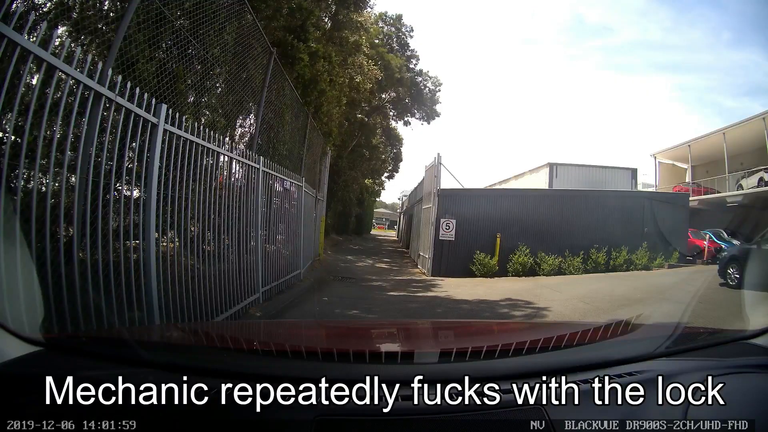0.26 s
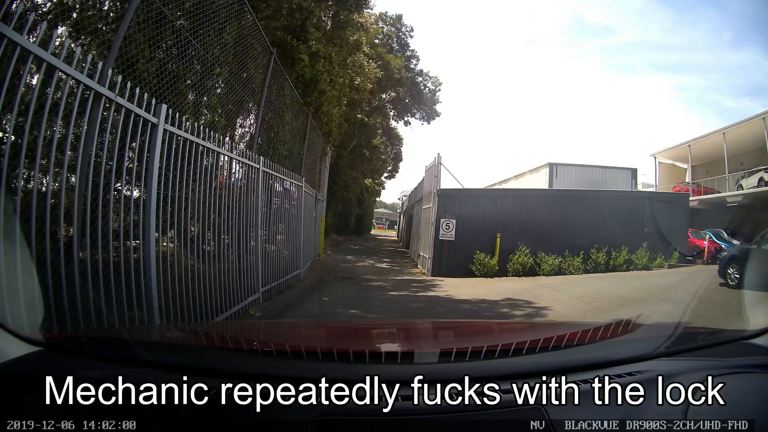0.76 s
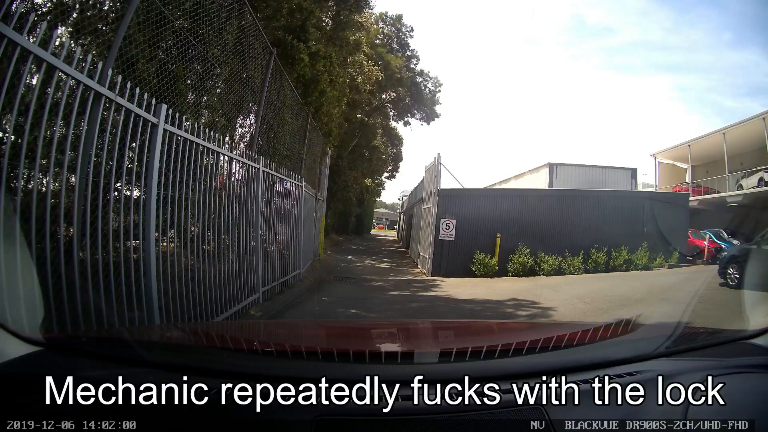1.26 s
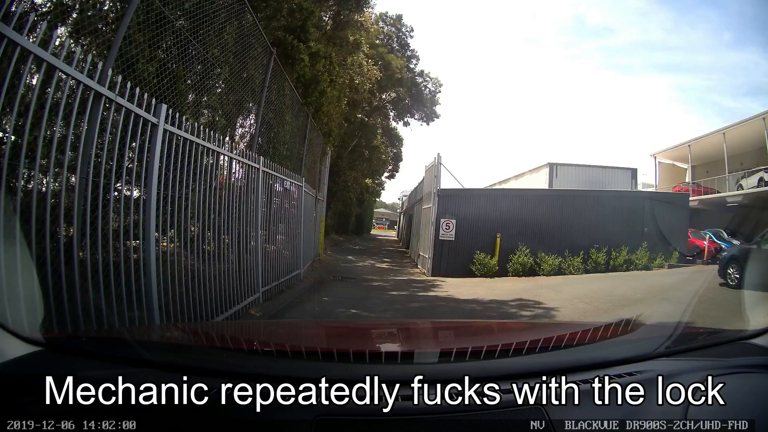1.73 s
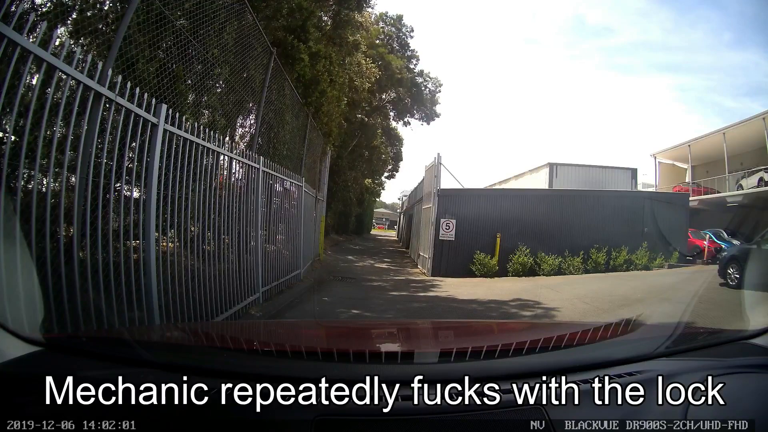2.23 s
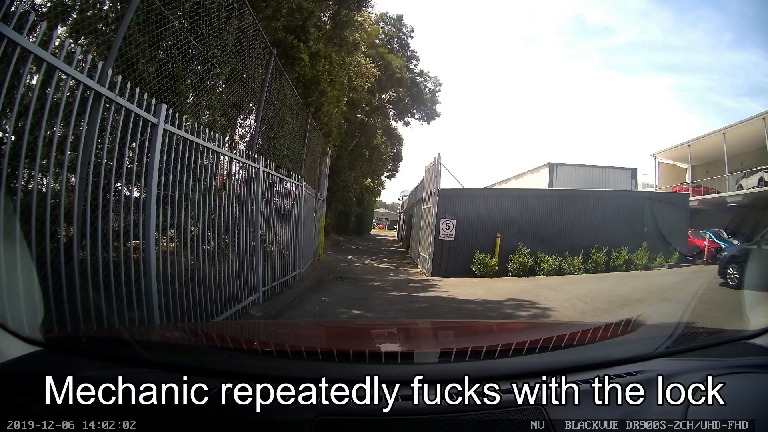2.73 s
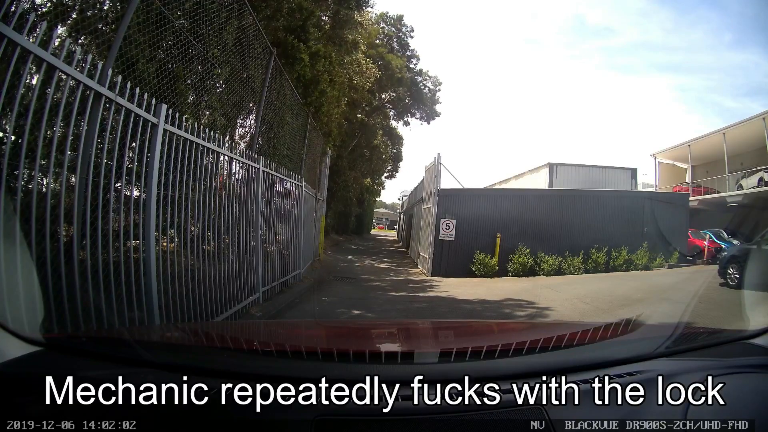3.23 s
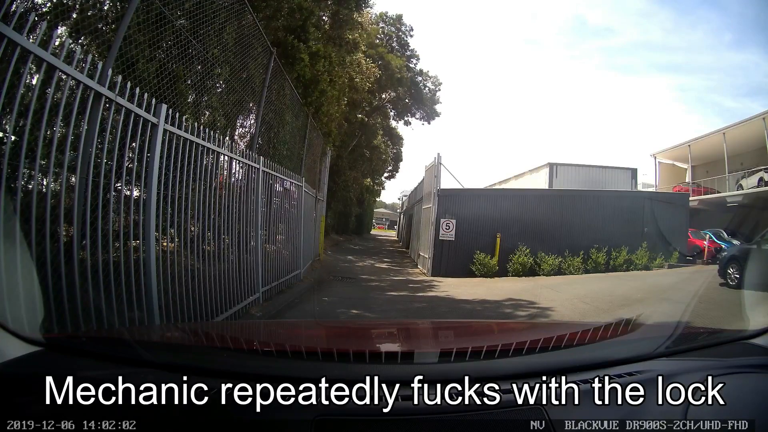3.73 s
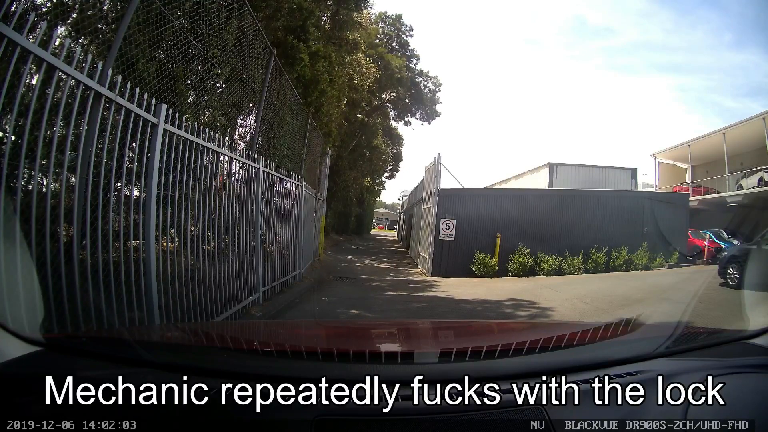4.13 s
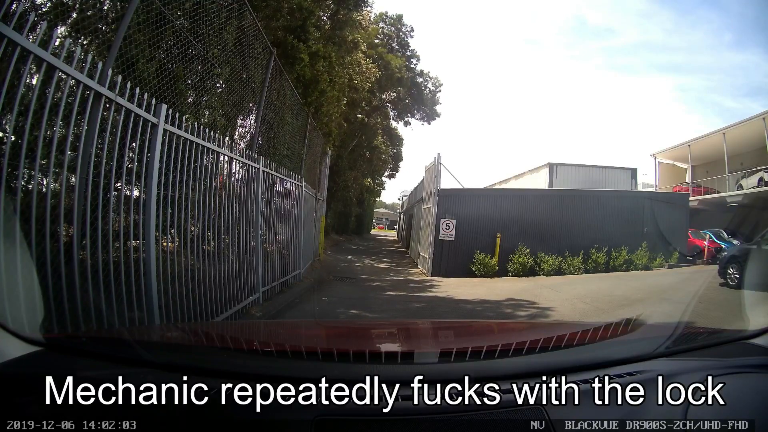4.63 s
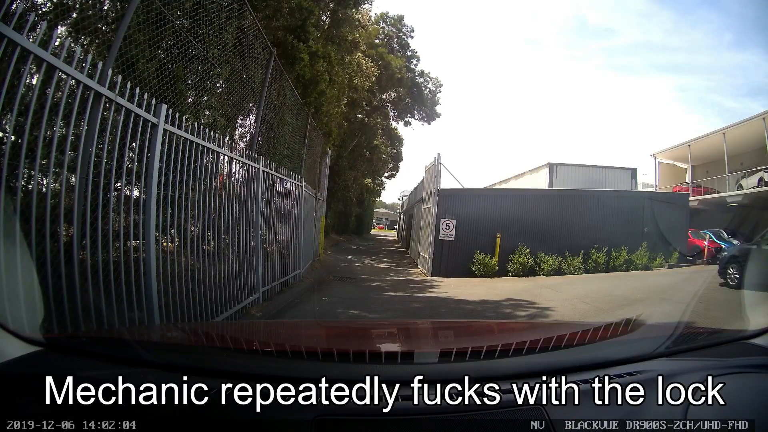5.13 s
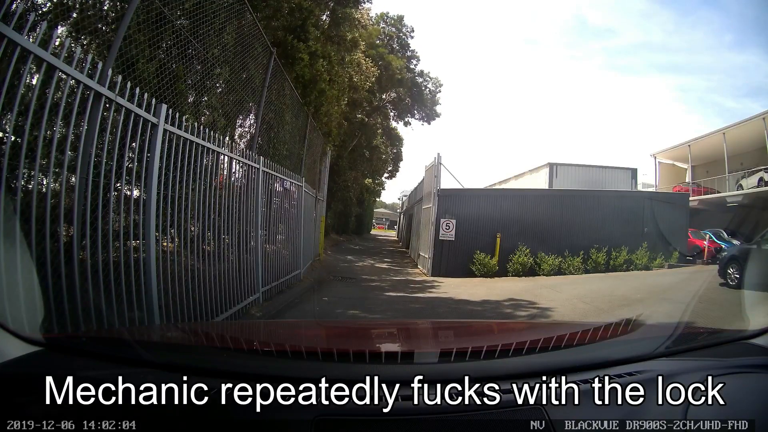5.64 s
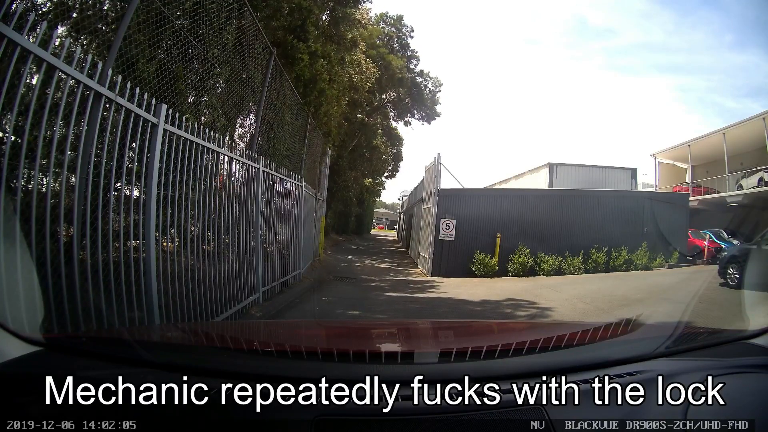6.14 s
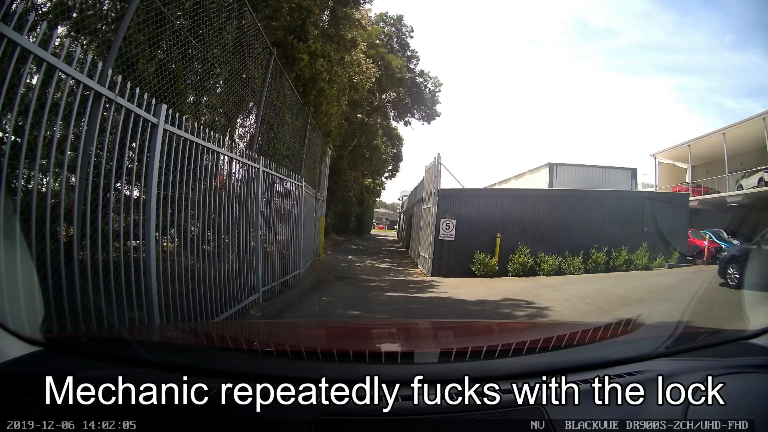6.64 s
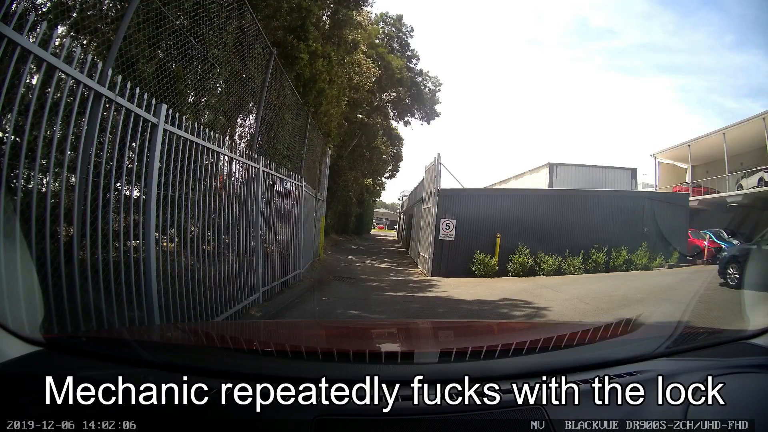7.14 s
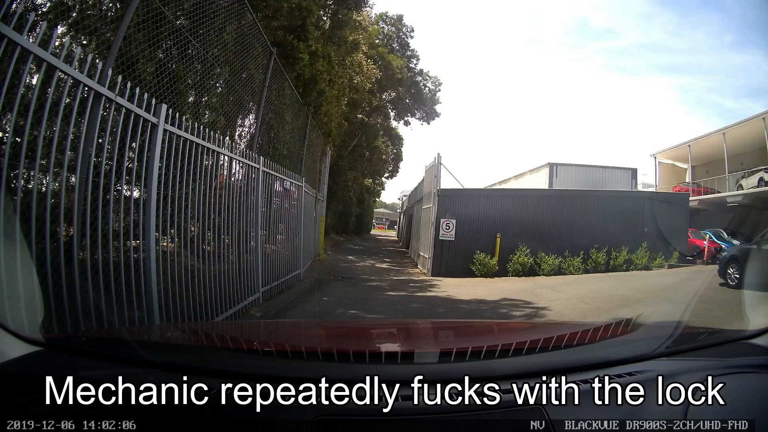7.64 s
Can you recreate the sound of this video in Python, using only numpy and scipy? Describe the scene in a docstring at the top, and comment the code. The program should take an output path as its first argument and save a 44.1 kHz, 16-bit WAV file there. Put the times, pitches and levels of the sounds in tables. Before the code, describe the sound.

Heard from a dashboard microphone in a closed, parked car: near silence with faint rumble and hiss, then the central locking clunks seven times at uneven gaps. Most are quick kick-and-slam pairs with a tiny gear rattle between, door panels ringing briefly. Relay clicks and a soft settling knock follow each. A faint high chirp flutters once midway.

```python
"""Inside a parked car the central locking is worked seven times over a faint rumble and hiss.
Each time a relay clicks close by and small motors rattle their gears: noisy, filtered tooth clicks.
Most strokes start with a kick, all end in a slam: filtered noise plus the door's ringing sine tones.
The first stroke also scrapes; about .4 s after each, the gears run back and settle, and springs shiver.
A fluttering chirp comes after the third working, a faint tap in the long pause after the fourth."""
import sys
import numpy as np
from scipy import signal
from scipy.fft import rfft, irfft, next_fast_len
from scipy.io import wavfile
from scipy.ndimage import uniform_filter1d

SR = 44100
rng = np.random.default_rng(int(sys.argv[2]) if len(sys.argv) > 2 else 0)


def waveform_to_disk(signal):
    """Save audio, clipped to [-1, 1], as 16-bit WAV at the path in sys.argv[1]."""
    frames = np.transpose(np.atleast_2d(signal))
    scaled = np.clip(frames, -1, 1) * 32767
    samples = np.round(scaled).astype(np.int16)
    wavfile.write(sys.argv[1], SR, samples)


N = 347949  # length in samples
T = np.arange(SR // 2) / SR  # clock in seconds for one short sound; each is cut off after half a second

# Strokes that start with a kick; at first two doors work slightly out of step. Each row: start in seconds,
# travel in seconds, kick boom in dB, stop level in dB, stop boom in dB, metal clack in dB,
# gear level in dB, settling level in dB.
KICKED_STROKES = [(1.748, .049, 3.5, -28.5, 2.5, 2, -45, -50), (1.761, .052, -6, -28, 8, -0.5, -39, -53),
                  (2.600, 0.058, 0, -25.5, 0.5, -8, -43, -48),
                  (3.958, 0.061, 0.5, -26, 1.5, -7.5, -42, -48.5),
                  (5.949, .060, -7.5, -24.5, -1.5, -8, -41.5, -50.5),
                  (6.739, 0.058, 0, -24, 1, -9, -41, -49.5)]
# Strokes that glide in on swelling gears and end in a double latch. Each row: start in seconds, travel in
# seconds, first latch level in dB, stop level in dB, boom in dB, metal clack in dB, settling level in dB.
GLIDING_STROKES = [(3.213, .060, -29.5, -32, -4, -6.5, -48.5), (7.443, .056, -44, -27, -0.5, -3.5, -48)]
# One faint tap in the long pause. It holds: time in seconds, level in dB, panel boom in dB, metal clack in dB.
FAINT_TAP = (4.680, -59.5, 7, -11)
# A blow and its rebounds. Each row: delay in seconds, relative level in dB.
REBOUNDS = [(0, 0.5), (.0052, -6), (.0135, -8.5)]
# Ringing tones of door and cabin. Each row: pitch in Hz, relative level in dB, time to fall 60 dB in seconds.
DOOR_MODES = [(69.8, -5, 0.39), (93, -6.5, 0.6), (105.8, -8, 0.41), (132.2, -6.5, 0.37), (155.6, -9, 0.12),
              (192.7, -8, 0.25), (214.4, -7, 0.35), (285.6, 2, 0.15), (315.2, 1, 0.15), (369.3, 2, 0.11),
              (528, -2.5, 0.11), (547, -17, 0.11), (598, -11, 0.069), (759, -1.5, 0.1), (860, -13, 0.21),
              (1011, -7, 0.079), (1040, -11.5, 0.16), (1230, 1, 0.12), (1342, -11, 0.18), (1743, -8, 0.08),
              (2150, -16.5, 0.13)]
# Cabin echo. Each row: frequency in Hz, time to fall 60 dB in seconds.
CABIN_DECAY = [(80, 0.8), (200, 0.29), (400, 0.21), (1200, 0.18), (2000, 0.13), (6000, 0.2)]

# Tone colours of the sounds. Each row: frequency in Hz, relative level in dB per Hz.
KICK_COLOUR = [(40, -57), (100, -30), (170, 2), (300, 2.5), (420, -12), (540, 0.5), (720, -9.5), (1250, -9),
               (1600, -19), (2000, -31), (2500, -53), (3100, -46), (4000, -73), (7500, -65)]
STOP_COLOUR = [(35, -29.5), (70, -16.5), (140, -2), (300, -7), (450, -9), (600, -4.5), (850, -10.5),
               (1280, -9.5), (1600, -16.5), (2000, -42), (2500, -47), (3100, -46), (4000, -71), (7500, -85)]
SETTLE_COLOUR = [(40, -23.5), (100, 7), (250, -12), (450, -12), (600, 1), (850, -1.5), (1300, -7.5),
                 (1600, -29), (1950, -18), (2500, -40), (7500, -63)]
CLACK_COLOUR = [(200, -17.5), (900, -5), (1280, 11), (1600, -15), (1850, 6.5), (2150, -5.5), (2500, -16),
                (3150, -13), (3800, -31.5), (5000, -30), (5650, -31.5), (6500, -42), (7800, -41)]
GEAR_COLOUR = [(60, -35), (200, -27.5), (350, -2), (480, -13.5), (600, -3.5), (800, -11.5), (1080, 3.5),
               (1400, -6), (1650, -24), (2000, -12), (2500, -36), (3100, -33), (4000, -47.5), (7500, -65)]
RUMBLE_COLOUR = [(40, -23.5), (80, -17.5), (135, 8), (200, -6), (300, -2), (550, -12.5), (900, -12.5),
                 (2000, -58.5)]
SPRING_COLOUR = [(60, -23), (110, 7.5), (300, -0.5), (800, -11.5), (1180, -3), (1550, -21.5), (2000, -17.5),
                 (3000, -46), (7500, -42)]
SCRAPE_COLOUR = [(2500, -32), (4000, -16), (5000, -9), (5650, 1), (6400, -15), (7800, -24)]
TICK_COLOUR = [(100, -21), (500, -9.5), (950, -20), (1280, 5), (1580, -12.5), (1850, 4.5), (2150, -6),
               (2500, -27.5), (2850, -12.5), (3600, -49), (7500, -42)]
FLOOR_COLOUR = [(15, -14.5), (44, -7), (87, -5), (120, -5.5), (148, -1), (180, -6), (240, -10), (400, -15),
                (800, -21), (1500, -25.5), (3000, -30), (5500, -34.5), (6800, -38), (7800, -37.5)]

# Thin metallic scrapes of the linkage. Each row: time in seconds, level in dB.
LINKAGE_SCRAPES = [(1.764, -53.5), (1.797, -57.5)]
# Moments when the relay closes. Each entry: time in seconds.
RELAY_CLOSINGS = [1.818, 2.4977, 3.2874, 3.9572, 6.0163, 6.696, 7.486]
# Strength of the mirrored treble. Each row: frequency in Hz, gain in dB.
MIRROR_GAIN = [(7500, 4.5), (9300, -6), (10500, -10.5), (12000, -18.5), (13200, -26), (14100, -33.5),
               (14800, -44), (15600, -61)]

# The kick always has the same level and is less metallic than the stop.
KICK_DB, KICK_CLACK_DB = -27, -5
# The motor starts just before the kick and runs almost evenly.
MOTOR_LEAD_S, KICKED_SWELL_DB, KICKED_RUMBLE_DB = .0068, 2.5, 6
GLIDE_DB, GLIDE_SWELL_DB, GLIDE_RUMBLE_DB = -40.5, 6.5, -2.5
LATCH_LEAD_S = .013  # the first latch comes this long before the stop
# A fixed time after each start the gears run back softly and the mechanism settles.
RETURN_AFTER_S, RETURN_S = .393, .0525
RETURN_DB, RETURN_SWELL_DB, RETURN_RUMBLE_DB = -61, -4.5, 2
SETTLE_BOOM_DB, SETTLE_CLACK_DB = 5, -11
RELAY_HOLD_S = .339  # from closing to dropping out
CHIRP_S, CHIRP_LENGTH_S, CHIRP_HZ, CHIRP_DB = 3.66, 0.36, 4960, -78
CAMERA_HZ = 16000  # sampling rate of the camera
TOP_HZ = 15650  # nothing is heard from here up


def amp(db):
    """Turn decibels into a gain."""
    return 10 ** (np.asarray(db) / 20)


def unit(x):
    """Scale x to an average strength (rms) of 1."""
    return x / np.sqrt(np.mean(x ** 2) + 1e-20)


def along(points, hz):
    """Read values between (Hz, value) points, with frequency on a log axis."""
    f, v = np.transpose(points)
    return np.interp(np.log(hz + 1), np.log(f + 1), v)


def add(track, s, x):
    """Mix x into the track from time s, dropping what runs past the end."""
    part = track[round(s * SR):][:len(x)]
    part += x[:len(part)]


def filtered(x, gain):
    """Multiply each frequency of x by its own gain."""
    size = next_fast_len(len(x) + 8192)
    hz = np.fft.rfftfreq(size, 1 / SR)
    return irfft(rfft(x, size) * gain(hz), size)[:len(x)]


def coloured(x, spectrum):
    """Filter x without sounding ahead of it, keeping the power of white noise."""
    size = 4096
    level = along(spectrum, np.fft.rfftfreq(size, 1 / SR))
    # folding the cepstrum forward in time puts the filter's energy as early as possible
    cepstrum = irfft(np.log(amp(level)))
    forward = 2 * cepstrum[:size // 2] * (np.arange(size // 2) > 0)
    response = irfft(np.exp(rfft(forward, size)))
    return signal.fftconvolve(x, response / np.linalg.norm(response))[:len(x)]


def burst(t60, attack):
    """The brief chatter of a hard contact: noise with a rise and a fall, both in seconds."""
    return rng.standard_normal(len(T)) * amp(-60 * T / t60) * (1 - np.exp(-T / attack))


def reflections():
    """Dense cabin echoes: noise that starts near rms 1 and fades, the bass lasting longest."""
    hz, t, z = signal.stft(rng.standard_normal(len(T)), SR, nperseg=256)
    fade = amp(-60 * t / along(CABIN_DECAY, hz)[:, None])
    return signal.istft(z * fade, SR, nperseg=256)[1][:len(T)]


def strokes():
    """Each stroke is a gear run up to the stop, then a soft run back.
    Blows are (s, level dB, boom dB, clack dB); runs are (s, length s, level dB, swell dB, rumble dB)."""
    kicks, stops, settles, runs = [], [], [], []
    for s, travel, kick_boom_db, db, boom_db, clack_db, gears_db, _ in KICKED_STROKES:
        kicks.append((s, KICK_DB, kick_boom_db, clack_db + KICK_CLACK_DB))
        runs.append((s - MOTOR_LEAD_S, travel + MOTOR_LEAD_S, gears_db, KICKED_SWELL_DB, KICKED_RUMBLE_DB))
        stops.append((s + travel, db, boom_db, clack_db))
    for s, travel, latch_db, db, boom_db, clack_db, _ in GLIDING_STROKES:
        runs.append((s, travel, GLIDE_DB, GLIDE_SWELL_DB, GLIDE_RUMBLE_DB))
        stops.append((s + travel - LATCH_LEAD_S, latch_db, boom_db, clack_db))
        stops.append((s + travel, db, boom_db, clack_db))
    for s, *_, settle_db in KICKED_STROKES + GLIDING_STROKES:
        back = s + RETURN_AFTER_S
        runs.append((back, RETURN_S, RETURN_DB, RETURN_SWELL_DB, RETURN_RUMBLE_DB))
        settles.append((back + RETURN_S, settle_db, SETTLE_BOOM_DB, SETTLE_CLACK_DB))
    return kicks, stops, settles + [FAINT_TAP], runs


def knocks(rows, spectrum, chatter_t60, chatter_db, snap_db, cabin_db, ring_db, boom_cycles):
    """One part strikes one spot: snap, rebounds, loose chatter, cabin echoes and the door's ring."""
    out = np.zeros(N)
    hz, mode_db, t60 = np.transpose(DOOR_MODES)[:, :, None]

    def bass(f):
        """Share of each frequency that the big panels radiate."""
        return 1 / (1 + (f / 400) ** 2)

    def chatter():
        """Loose rattling, with cabin echoes that build up behind it."""
        echoes = reflections() * (1 - np.exp(-T / 0.0049))
        return amp(chatter_db) * burst(chatter_t60, attack=0.00067) + amp(cabin_db) * echoes

    snaps = np.zeros(len(T))
    for k, (lag, db) in enumerate(REBOUNDS):
        push = (-1) ** k  # each rebound pushes the panel the other way
        add(snaps, lag, push * amp(db + snap_db) * signal.unit_impulse(1))
    usual = chatter()
    # low tones take longer to build up; neighbouring tones swing in opposite directions
    swell = amp(-60 * T / t60) * (1 - np.exp(-T * hz / boom_cycles))
    modes = swell * np.sin(2 * np.pi * hz * T) * (-1) ** np.arange(len(hz))[:, None]
    for s, db, boom_db, clack_db in rows:
        # the same parts meet each time, so the blows are partly alike
        force = snaps + .6 * usual + .7 * chatter()
        blow = coloured(force, [(f, level + boom_db * bass(f)) for f, level in spectrum])
        strike_db = mode_db + boom_db * bass(hz) + rng.normal(0, 0.85, hz.shape)
        ring = np.sum(modes * amp(strike_db), axis=0)
        clack = coloured(burst(t60=0.086, attack=0.0045), CLACK_COLOUR)
        add(out, s, amp(db) * (blow + amp(ring_db) * ring + amp(clack_db) * clack))
    return out


def gears(runs, tooth_hz, scatter, grit, cabin_db):
    """Gear teeth click at uneven gaps while each motor runs; the motor shakes the door."""
    out = np.zeros(N)
    for s, length, db, swell_db, rumble_db in runs:
        edges = np.clip(np.minimum(T, length - T) / 0.0031, 0, 1)
        drive = amp(swell_db * (np.minimum(T / length, 1) - 1.0)) * edges
        wander = unit(uniform_filter1d(rng.standard_normal(len(T)), size=128))
        turns = np.cumsum(tooth_hz * np.exp(scatter * wander)) / SR
        # one click whenever the count of teeth goes up by one
        teeth = unit(np.diff(np.floor(turns), prepend=0) - tooth_hz / SR)
        rattle = drive * unit(teeth + grit * rng.standard_normal(len(T)))
        tail = reflections()
        echoes = signal.fftconvolve(rattle, tail / np.linalg.norm(tail))[:len(T)]
        rattle = rattle + amp(cabin_db) * echoes
        rumble = coloured(drive * rng.standard_normal(len(T)), RUMBLE_COLOUR)
        add(out, s, amp(db) * (coloured(rattle, GEAR_COLOUR) + amp(rumble_db) * rumble))
    return out


def relay(close_db, open_db, t60):
    """The relay's armature snaps in and out behind the dashboard, nearly alike each time."""
    out, usual = np.zeros(N), burst(t60, attack=0.00073)
    for s in RELAY_CLOSINGS:
        for lag, db in (0, close_db), (RELAY_HOLD_S, open_db):
            snap = usual + burst(t60, attack=0.0016) + amp(-23) * reflections()
            add(out, s + lag, amp(db) * coloured(snap, TICK_COLOUR))
    return out


def springs(settles, level_db, t60):
    """The return springs shiver on after each settling and the faint tap: slowly rising, fading noise."""
    out = np.zeros(N)
    for s, db, _, _ in settles:
        add(out, s, amp(db + level_db) * coloured(burst(t60, attack=0.028), SPRING_COLOUR))
    return out


def linkage():
    """The dry linkage scrapes on the first stroke: short bursts of bright noise."""
    out = np.zeros(N)
    for s, db in LINKAGE_SCRAPES:
        add(out, s, amp(db) * coloured(burst(t60=0.1, attack=0.0027), SCRAPE_COLOUR))
    return out


def chirp(flutter_hz, waver):
    """A faint, high tone, as of a bird outside, that flutters and wavers slightly in pitch."""
    out = np.zeros(N)
    wander = unit(uniform_filter1d(rng.standard_normal(len(T)), size=128))
    hz = CHIRP_HZ * (1 + waver * wander)
    edges = np.clip(np.minimum(T, CHIRP_LENGTH_S - T) / .04, 0, 1)
    shape = edges * np.abs(np.sin(np.pi * flutter_hz * T))
    add(out, CHIRP_S, amp(CHIRP_DB) * shape * np.sin(2 * np.pi * np.cumsum(hz) / SR))
    return out


def background(level_db):
    """Faint outdoor rumble through the closed doors, and microphone hiss: one steady filtered noise."""
    noise = rng.standard_normal(N)
    return amp(level_db) * unit(filtered(noise, lambda hz: amp(along(FLOOR_COLOUR, hz))))


def scene():
    """All the doors' locks and the relay, with the chirp and the background."""
    kick_rows, stop_rows, settle_rows, run_rows = strokes()
    kicks = knocks(kick_rows, KICK_COLOUR, chatter_t60=0.042, chatter_db=3.0, snap_db=11,
                   cabin_db=-9, ring_db=-16, boom_cycles=0.96)
    stops = knocks(stop_rows, STOP_COLOUR, chatter_t60=0.087, chatter_db=-2.5, snap_db=9.5,
                   cabin_db=-8.0, ring_db=-9.0, boom_cycles=1.0)
    settles = knocks(settle_rows, SETTLE_COLOUR, chatter_t60=0.12, chatter_db=7, snap_db=13.5,
                     cabin_db=2, ring_db=-14.5, boom_cycles=0.47)
    runs = gears(run_rows, tooth_hz=529.0, scatter=0.222, grit=0.87, cabin_db=-3.5)
    ticks = relay(close_db=-43.0, open_db=-46.5, t60=0.069)
    shivers = springs(settle_rows, level_db=-4.5, t60=1.0)
    mechanism = kicks + stops + settles + runs + ticks + shivers + linkage()
    return (mechanism + chirp(flutter_hz=21, waver=.006) + background(level_db=-57.0))[None]


def suppressed(x, depth_db, threshold_db, release):
    """A gentle noise suppressor: quiet passages sink, loud ones pass; release is in seconds."""
    keep = np.exp(-1 / (release * SR))
    power = signal.lfilter([1 - keep], [1, -keep], x ** 2)  # smoothed loudness
    return x * amp(-depth_db / (1 + power / amp(threshold_db) ** 2))


def record(dry):
    """The dashboard camera samples slowly: the sound is mirrored around half its rate."""
    sound = suppressed(dry[0], depth_db=6.0, threshold_db=-52.0, release=0.024)
    sound = filtered(sound, lambda hz: 1 / np.sqrt(1 + (hz / 7300) ** 40))  # steep treble cut
    mirror = 2 * sound * np.cos(2 * np.pi * CAMERA_HZ * np.arange(N) / SR)
    sound = sound + filtered(mirror, lambda hz: amp(along(MIRROR_GAIN, hz)))
    return filtered(sound, lambda hz: hz < TOP_HZ)[None]


dry = scene()
out = record(dry)
waveform_to_disk(out)
```